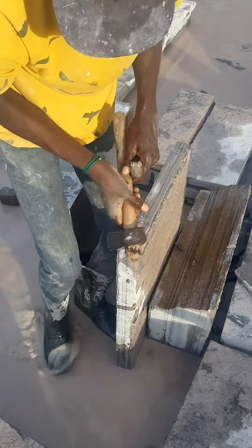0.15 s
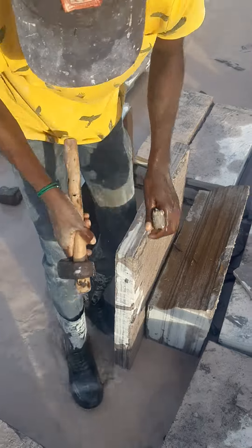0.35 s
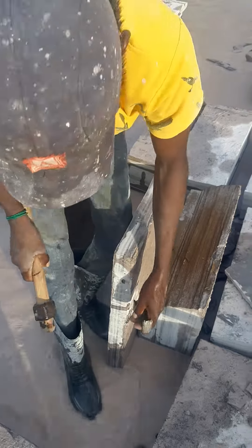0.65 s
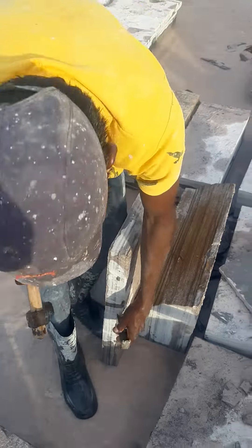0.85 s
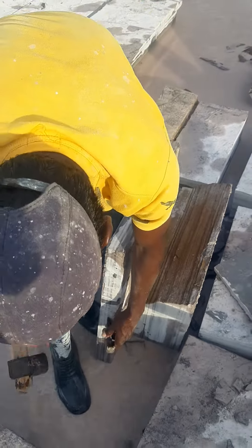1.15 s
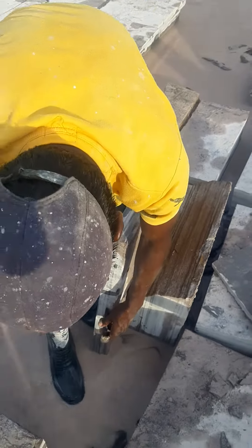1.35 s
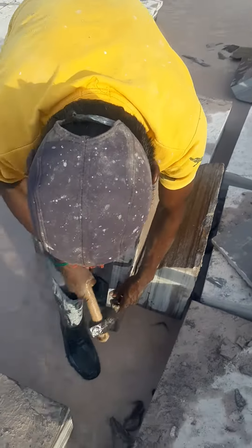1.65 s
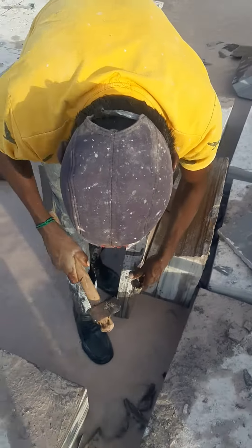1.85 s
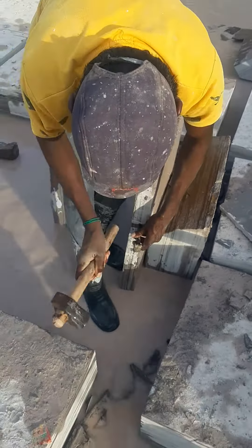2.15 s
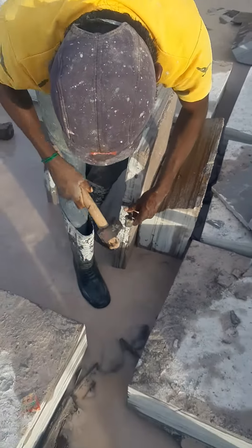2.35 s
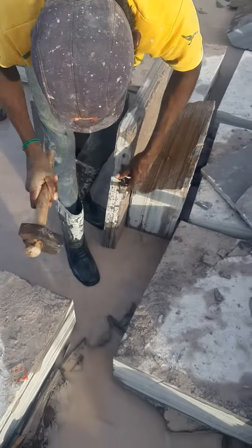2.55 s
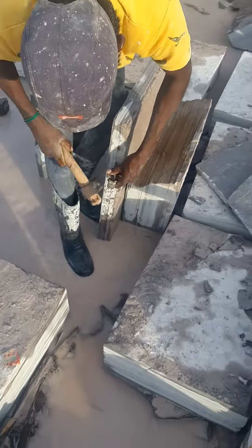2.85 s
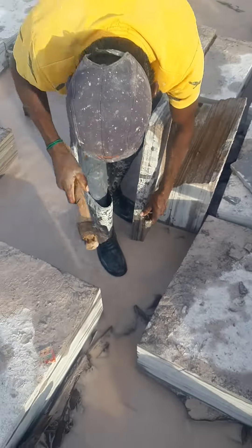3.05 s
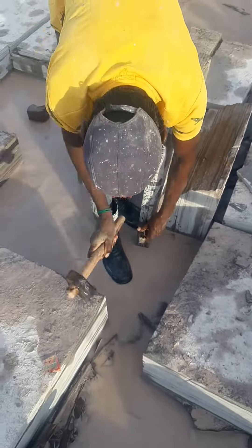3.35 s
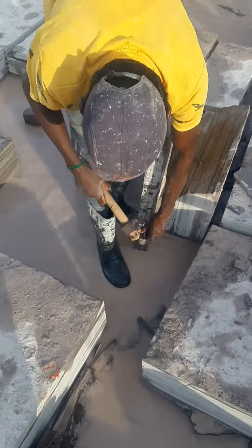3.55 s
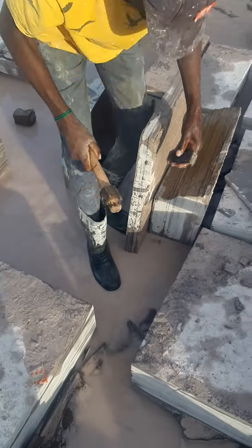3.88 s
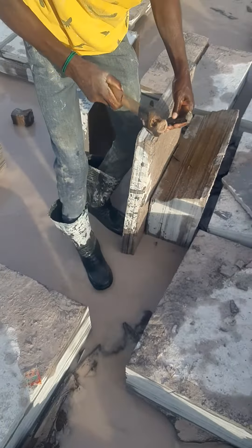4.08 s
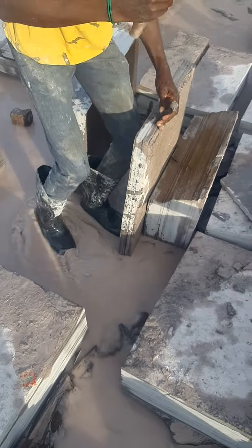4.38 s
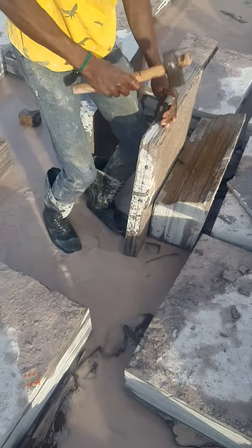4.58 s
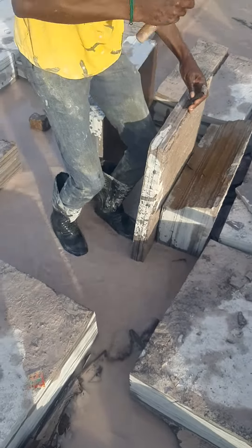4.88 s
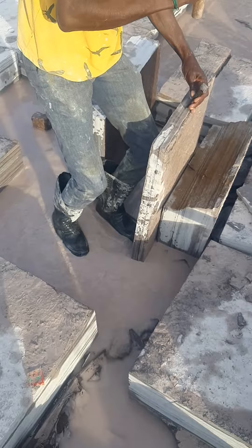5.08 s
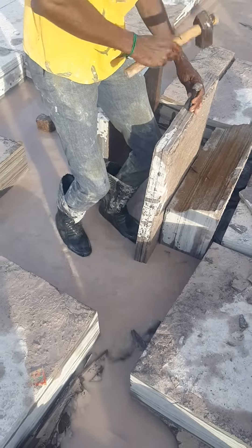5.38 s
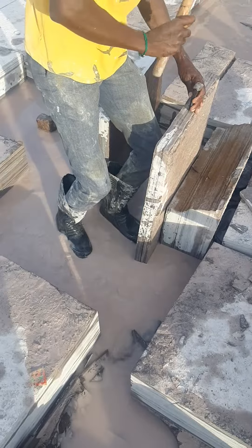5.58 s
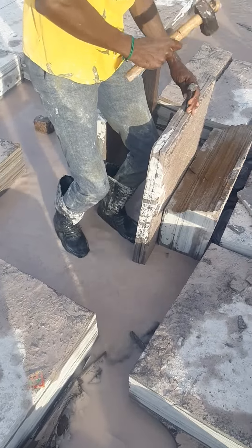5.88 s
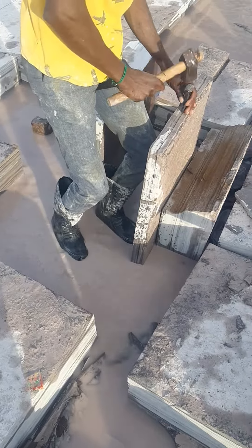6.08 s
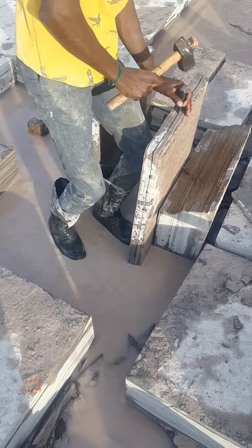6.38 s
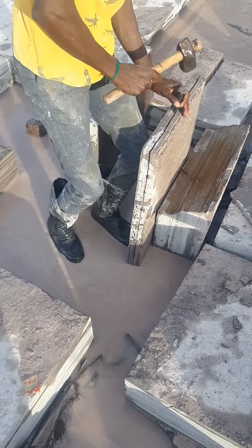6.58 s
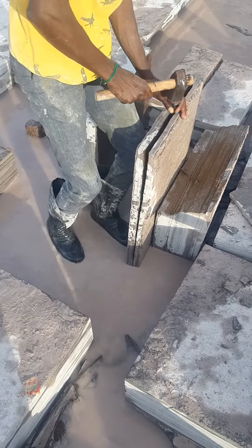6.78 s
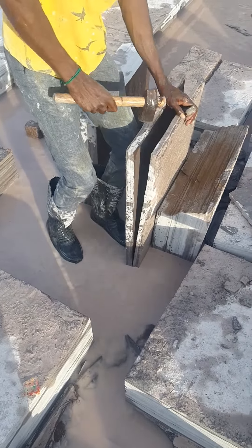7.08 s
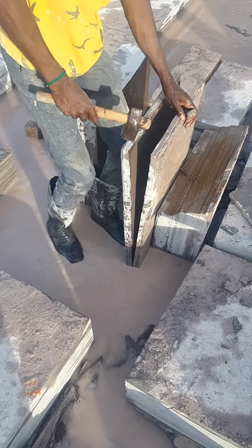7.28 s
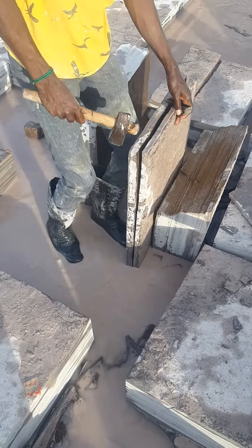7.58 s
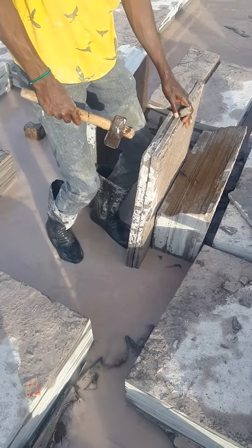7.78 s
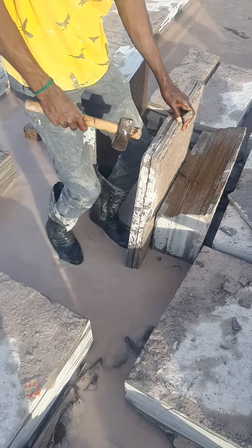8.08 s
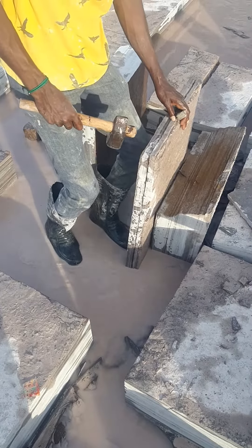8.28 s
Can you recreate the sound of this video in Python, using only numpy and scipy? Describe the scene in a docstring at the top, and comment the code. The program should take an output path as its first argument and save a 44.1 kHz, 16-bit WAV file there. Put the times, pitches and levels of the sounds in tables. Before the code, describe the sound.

An outdoor stone yard, heard close in stereo and nearly dry. Throughout, an engine drones with a throb near 26 pulses a second over low rumble, and wet saws hiss brightly; early on a blade grinds and sings more strongly, easing after 2 s. Around 0.9-1.05 s the slab scrapes and bumps in a gritty cluster. Hammer blows on the chisel follow at 1.65, 2.3, 2.8 and 3.5 s: bright, very short steel clinks with gritty cracks and a stone knock, with lighter touches between until 3.1 s. From 3.9 s, and steadily after 4.8 s, dull taps sound farther off, about four a second. Stronger blows come at 4.6, 5.25, 5.7, 6.1, 6.45 and 6.7 s, the last duller and more stony. The engine speeds up slightly after 5.3 s. Low slab bumps fall at 7.65, 7.8 and 8.35 s while engine and hiss swell to the end.

```python
"""An open stone yard, where a mason splits a standing slab with hammer and chisel.
Behind the work an engine drones in multiples of its firing rate over a noise rumble, stone saws hiss
and grind as coloured noise with ringing blades, and someone farther off taps on dull stone modes.
The slab grates and bumps as bursts of noise ring its modes. Each blow is a steel clink of damped sines,
a crack of crushed grit and a short knock of the slab."""
import sys
import numpy as np
from scipy import signal
from scipy.fft import rfft, irfft, next_fast_len
from scipy.io import wavfile
from scipy.ndimage import uniform_filter1d

SR = 44100
rng = np.random.default_rng(int(sys.argv[2]) if len(sys.argv) > 2 else 0)


def unload_wav(signal):
    """Save mono or channel-first audio to the path in sys.argv[1] as 16-bit WAV at rate SR, clipped to [-1, 1]."""
    wavfile.write(
        sys.argv[1],
        SR,
        np.round(np.clip(np.atleast_2d(signal).T, -1, 1) * 32767).astype(np.int16),
    )


N = 371763  # samples in the scene
BURST = int(0.25 * SR)  # samples in one short sound


def from_db(db):
    """Decibels to gain."""
    return 10 ** (np.asarray(db) / 20)


def rms_one(x):
    """Scale to rms 1."""
    return x / np.sqrt(np.mean(x ** 2) + 1e-20)


def in_time(rows):
    """Draw each column of a time table as a curve, sample by sample."""
    seconds, *columns = np.transpose(rows)
    t = np.arange(N) / SR
    return [np.interp(t, seconds, column) for column in columns]


def at_hz(points, hz):
    """Read a frequency table on a log-frequency axis."""
    table_hz, value = np.transpose(points)
    return np.interp(np.log(hz + 1), np.log(table_hz), value)


def drift(rate_hz):
    """Slow random wander of rms about 1, drawn every 100 samples and joined by straight lines."""
    step = 100
    r = np.exp(-2 * np.pi * rate_hz * step / SR)
    draws = rng.standard_normal(N // step + 1002)
    slow = signal.lfilter([1], [1, -2 * r, r * r], draws)[1000:]  # skip the filter's start
    return np.interp(np.arange(N) / step, np.arange(len(slow)), rms_one(slow))


def add(out, s, sound):
    """Mix a short stereo sound in at a time in seconds."""
    start = max(int(s * SR), 0)
    out[:, start:start + sound.shape[1]] += sound[:, :N - start]


def pair(alike, mid, side):
    """Blend a shared and an opposed signal into left and right of a given likeness."""
    alike = np.clip(alike, -1, 1)
    return np.sqrt(1 + alike) * mid + np.sqrt(1 - alike) * side * np.array([[1], [-1]])


def lagged(x, lag_table):
    """Delay the right channel's phase by frequency, as when sound reaches one ear later."""
    size = next_fast_len(N + BURST)
    hz = np.arange(size // 2 + 1) * SR / size
    lag = np.interp(hz, *np.transpose(lag_table))
    right = irfft(rfft(x[1], size) * np.exp(-1j * lag), size)[:N]
    return np.array([x[0], right])


def resonance(x, hz, width_hz):
    """One damped mode, gain 1 at its top."""
    r = np.exp(-np.pi * width_hz / SR)
    poles = [1, -2 * r * np.cos(2 * np.pi * hz / SR), r * r]
    return (1 - r * r) / 2 * signal.lfilter([1, 0, -1], poles, x)


def dull(x, top_hz=1800):
    """Heavy stone gives off little treble."""
    return signal.sosfilt(signal.butter(4, top_hz, fs=SR, output="sos"), x)


# likeness of the ears for short contacts: (frequency [Hz], likeness [-1 to 1])
CONTACT_LIKENESS = [(450, .9), (700, 0.42), (1400, 0.27), (2200, 0.097)]


def strike(modes, rise_s, contact_s, scatter_db=2.0, grain_db=0):
    """A crunching contact dies away while the body rings; the loudest 4 ms have rms 1."""
    t = np.arange(BURST) / SR
    # grains catch and break about every 2 ms
    catches = from_db(grain_db * np.repeat(rng.standard_normal(BURST), 88)[:BURST])
    envelope = (1 - np.exp(-t / rise_s)) * np.exp(-t / contact_s)
    force = rng.standard_normal((2, BURST)) * catches * envelope + 1e-18
    out = 0
    for k, (hz, width_hz, db) in enumerate(modes):
        ring = resonance(pair(at_hz(CONTACT_LIKENESS, hz), *force), hz, width_hz)
        sign = (-1) ** k  # neighbouring modes push opposite ways
        out = out + sign * from_db(db + scatter_db * rng.standard_normal()) * ring
    power = uniform_filter1d(np.mean(out ** 2, axis=0), size=176)
    return out / np.sqrt(power.max())


# likeness of the ears for the machines: (frequency [Hz], likeness [-1 to 1])
MACHINE_LIKENESS = [(50, 0.78), (150, 1), (400, 0.97), (680, 0.13), (1000, 0.6), (1800, 0.25), (4000, 0.53),
                    (14000, 0.28)]


def far_noise(colour, patchy_db=0.0, patchy_rate=5.5):
    """Coloured stereo noise of rms 1, whose quarter-octave bands can come and go separately."""
    size = next_fast_len(N)
    hz = np.arange(size // 2 + 1) * SR / size
    spectra = rfft(rng.standard_normal((2, size)))
    both = pair(at_hz(MACHINE_LIKENESS, hz), *spectra) * from_db(at_hz(colour, hz))
    if not patchy_db:
        return rms_one(irfft(both, size)[:, :N])
    band = np.clip(np.round(4 * np.log2((hz + 1) / 1000)), 0, 12)
    out = 0
    for k in np.unique(band):
        part = irfft(both * (band == k), size)[:, :N]
        out = out + part * from_db(patchy_db * drift(patchy_rate))
    return rms_one(out)


# ring of the engine casing: (time [s], level [dB])
CASING_RING_LEVEL = [(0, -32), (.6, -28), (1.1, -29.5), (1.55, -34.5), (1.85, -29), (2.2, -35.5),
                     (2.45, -32), (2.95, -36.5), (3.3, -34), (4.5, -38), (5.4, -39.5), (6.5, -41),
                     (7.2, -31.5), (7.6, -37), (8.43, -32)]


def casing(turn, hz=938, width_hz=44, uneven_db=1.5, slip_s=0.00006):
    """Every firing knocks the casing, never quite equally hard or on time, and sets it ringing."""
    level_db, = in_time(CASING_RING_LEVEL)
    firings = np.flatnonzero(np.diff(turn // (2 * np.pi)))
    slips = (slip_s * SR * rng.standard_normal(len(firings))).astype(int)
    knocks = np.zeros(N)
    knocks[np.clip(firings + slips, 0, N - 1)] = from_db(uneven_db * rng.standard_normal(len(firings)))
    # two equal modes in a row soften the onset
    ring = resonance(resonance(knocks + 1e-18, hz, width_hz), hz, width_hz)
    return from_db(level_db) * rms_one(ring)


# engine speed: (time [s], firing rate [firings per s])
FIRING_RATE = [(0.0, 25.9), (0.4, 25.95), (0.8, 26.16), (1.2, 25.83), (2.8, 25.72), (3.6, 25.84),
               (5.2, 25.86), (5.6, 26.05), (6.0, 26.64), (6.4, 26.38), (7.2, 26.45), (7.65, 26.9),
               (8.43, 26.26)]
# engine drone: (time [s], level [dB])
DRONE_LEVEL = [(0.0, -29), (1.27, -28), (1.99, -32), (3.71, -34.5), (4.3, -35.5), (4.76, -32),
               (5.26, -34.5), (7.3, -32), (8.43, -23.5)]
# exhaust spectrum: (multiple of the firing rate, level at idle [dB], level after speeding up [dB])
EXHAUST_ORDERS = [(8, -15, -16), (9, -10.5, -13), (10, -15, -14.5), (11, -7, -9.5), (12, -7.5, -4.5),
                  (13, -6.5, -3.5), (14, -1, 4.5), (15, -5, -5.5), (16, -2, -4.5), (17, -6.5, -7),
                  (18, -8, -9.5), (19, -7, -4.5), (20, 2.5, -2.5), (21, -7.5, -9), (22, -11, -5.5),
                  (25, -11.5, -14), (28, -12.5, -10.5), (29, -14, -10.5), (34, -12.5, -19)]
# the two multiples that swell and fade by themselves: (lower, upper)
SWELLING_ORDERS = (16, 20)
# their swelling: (time [s], change of the lower [dB], change of the upper [dB])
SWELLING_LEVELS = [(0, -4, -4.5), (.8, -17, 3.5), (1.05, 7, 1.5), (1.35, 3, 3), (1.7, 4.5, -3),
                   (2.5, -1.5, 2), (3.3, -4, 4), (3.9, 7.5, -0.5), (4.3, 2, -12), (4.7, -4, 2.5),
                   (5.2, -2, -10.5), (5.95, -7, -9), (6.3, -26, 5), (7.2, 4.5, -2), (8.43, -3, 2)]
# how far a multiple follows the drone's swing: (multiple, share of the swing in dB)
SWING_SHARE = [(18, 1), (34, 1.1)]
# noise under the drone: (time [s], level [dB])
RUMBLE_LOUDNESS = [(0, -34), (1.2, -32), (2, -37), (3.6, -38.5), (4.7, -37), (5.4, -38.5), (7.3, -36),
                   (8.43, -26.5)]
# colour of that noise: (frequency [Hz], level [dB per Hz])
RUMBLE_COLOUR = [(25, -59), (60, -28), (160, -18), (250, -11.5), (370, 3.5), (520, -5.5), (700, -3.5),
                 (950, -4), (1200, -7.5), (1600, -14.5), (1900, -1.5), (2600, -48)]


def engine(orders_db=-5.5, waver_db=2.14, jitter=0.13, uneven_db=0.5):
    """Multiples of the firing rate waver over a throbbing rumble; the casing rings along."""
    speed_up_s, speed_up_takes_s = 5.32, 0.78
    smear_orders, smear_scatter = 9, 0.7  # multiples spread over one firing, and scatter [radians]
    (speed,), (level_db,) = in_time(FIRING_RATE), in_time(DRONE_LEVEL)
    turn = 2 * np.pi * np.cumsum(speed) / SR
    faster = np.clip((np.arange(N) / SR - speed_up_s) / speed_up_takes_s, 0, 1)
    swelling_db = dict(zip(SWELLING_ORDERS, in_time(SWELLING_LEVELS)))
    mean_db = level_db.mean()
    drone = 0
    for k, idle_db, fast_db in EXHAUST_ORDERS:
        share = np.interp(k, *np.transpose(SWING_SHARE))
        drone_db = mean_db + share * (level_db - mean_db)
        order_db = orders_db + idle_db + faster * (fast_db - idle_db) + swelling_db.get(k, 0)
        gain = from_db(drone_db + order_db + waver_db * drift(2.7))
        smear = -np.pi * k * k / smear_orders + smear_scatter * rng.standard_normal()
        drone = drone + gain * np.cos(k * turn + smear + jitter * drift(2.7))
    throb = 1 + 0.057 * np.cos(turn)
    rumble = from_db(in_time(RUMBLE_LOUDNESS)[0]) * far_noise(RUMBLE_COLOUR) * throb
    both = drone * from_db(uneven_db * drift(12.0)) + rumble + casing(turn)
    return both * from_db([[-0.9], [0.9]])  # left, right


# saw blade modes: (start [s], end [s], frequency [Hz], width [Hz], level against the hiss [dB])
BLADE_MODES = [(-3, 0.7, 3940, 110, -4), (-1, .49, 3090, 200, -4), (0.5, 1.53, 3390, 25, -7),
               (5, 10, 4760, 76, -7), (4.5, 10, 3720, 450, -7.5), (.5, 10, 6700, 210, -8.5)]


def blades(fade_s=0.26, sway_db=1.07):
    """Friction in the cut keeps one blade resonance or another singing for a while."""
    t, out = np.arange(N) / SR, np.zeros((2, N))
    for start, end, hz, width_hz, db in BLADE_MODES:
        friction = pair(at_hz(MACHINE_LIKENESS, hz), *rng.standard_normal((2, N)))
        ring = resonance(friction, hz, width_hz)
        held = np.clip(np.minimum(t - start, end - t) / fade_s + 1, 0, 1)
        out += from_db(db + sway_db * drift(9.0)) * held * rms_one(ring)
    return out


# load on the saws: (time [s], level [dB])
CUTTING_LOAD = [(0.0, -24), (0.61, -26.5), (1.1, -24.5), (1.5, -24), (2.18, -28.5), (4.51, -28),
                (4.98, -26), (5.94, -31.5), (6.71, -30.5), (7.91, -25), (8.19, -20), (8.43, -21.5)]
# colours of the grind, the hiss and the spray: (frequency [Hz], level [dB per Hz])
GRIND_COLOUR = [(1000, -19), (1600, -5.5), (2200, 3.5), (2800, 5.5), (3300, 5.5), (4000, -37), (5000, -62),
                (7000, -30.5)]
HISS_COLOUR = [(1500, -49.5), (2600, -28), (3200, 7), (3800, 8), (4600, 9.5), (5400, 6), (6200, 6),
               (6900, 0.5), (7600, -2.5), (8600, -16), (10000, -20.5)]
SPRAY_COLOUR = [(7000, -9), (8500, 9), (9800, 3), (11200, 19.5), (12600, 11), (14000, 17.5), (15200, 12),
                (16000, 0)]


def saws(flutter_db=1.02):
    """Wet blades grind and hiss in the cut and throw a fine spray; all three follow the load."""
    hiss_db, grind_db, spray_db = -0.24, -10.5, -10  # against the load
    # at first one blade is deep in a cut and grinds louder, then runs out
    deep_cut_db, deep_cut_end_s, run_out_s = 7, 1.93, 0.74
    load_db, = in_time(CUTTING_LOAD)
    deep = np.exp(-np.maximum(np.arange(N) / SR - deep_cut_end_s, 0) / run_out_s)
    flutter = flutter_db * drift(48.0)
    grind_gain = from_db(load_db + grind_db + deep_cut_db * deep + 1.04 * drift(13.0))
    grind = grind_gain * far_noise(GRIND_COLOUR, patchy_db=2.35)
    hiss_and_rings = far_noise(HISS_COLOUR, patchy_db=1.5) + blades()
    hiss = from_db(load_db + hiss_db + flutter) * hiss_and_rings
    spray = from_db(load_db + spray_db + flutter) * far_noise(SPRAY_COLOUR)
    # left, right
    return (grind + hiss) * from_db([[-0.6], [0.6]]) + spray * from_db([[0.5], [-0.5]])


# tapping farther off: (time [s], level [dB], strongest ring [Hz])
DISTANT_TAPS = [(s, -26.5, 1700) for s in (3.87, 4.81, 5.044, 5.289, 5.52, 5.75, 5.971, 6.203, 6.429, 6.876, 7.1, 7.323, 7.543)] + [(7.78, -22, 1450),
                (8.023, -19.5, 1300)]
# modes of the far stone: (frequency [Hz], width [Hz], level [dB])
DISTANT_STONE_MODES = [(1250, 810, -15), (1510, 310, -10), (1900, 180, -8)]


def far_tapping(tick_db=-30, top_hz=2100):
    """Light, dull taps ring another stone, mostly about four a second, each with a faint tool tick."""
    out = np.zeros((2, N))
    for s, db, hz in DISTANT_TAPS:
        body = strike(DISTANT_STONE_MODES, 0.00075, 0.0048)
        ring = strike([(hz, 140, 0)], 0.00054, 0.0032)
        tick = strike([(3580, 460, 0)], 0.0003, 0.005)
        add(out, s, from_db(db) * dull(body + ring, top_hz) + from_db(tick_db) * tick)
    return out


def yard(x, t60=0.082, dull_hz=5000, gap_s=0.007):
    """Short, dull scatter from the stacked slabs, as decaying noise after a gap."""
    t = np.arange(BURST) / SR
    echoes = rng.standard_normal((2, BURST)) * from_db(-60 * t / t60) * (t > gap_s)
    echoes = signal.sosfilt(signal.butter(1, dull_hz, fs=SR, output="sos"), echoes)
    return signal.fftconvolve(x, rms_one(echoes) / np.sqrt(BURST), axes=1)[:, :N]


# slab shifting and bumping: (time [s], thud level [dB], grit level [dB], dying time [s],
# added ring [Hz], top of the sound [Hz])
SLAB_SHIFTS = [(0.862, -18, -24, 0.014, 650, 1900), (0.9599, -12, -19, 0.0082, 620, 2100),
               (0.968, -18, -12, 0.011, 1400, 3000), (0.979, -9.5, -24, 0.011, 850, 1900),
               (0.995, -15, -21.5, 0.027, 644, 2200), (1.023, -19, -25, 0.015, 400, 1800),
               (1.045, -19.5, -26, 0.022, 430, 1500), (5.6664, -21, -20.5, 0.015, 706, 2200),
               (5.679, -25.5, -23, 0.025, 980, 2700), (5.908, -26, -28, 0.019, 680, 1900),
               (7.655, -14, -27, 0.006, 445, 1310), (7.796, -20.5, -36, 0.006, 397, 1300),
               (8.336, -14, -19, 0.0077, 400, 1400)]
# low modes of the slab, then modes of rasping grit: (frequency [Hz], width [Hz], level [dB])
SLAB_MODES = [(345, 64, -5.5), (410, 46, 1), (484, 310, -4.5), (620, 124, 2.5), (855, 160, -3.5)]
RASP_MODES = [(1210, 260, 6.4), (1480, 340, 9.6), (1800, 320, 9.7), (2370, 400, 4.2)]


def slab(ring_db=-2.0, body_db=-4.0):
    """Stone drags on stone in jerks: grit rasps and the slab booms, with a ring chosen for each jerk."""
    out = np.zeros((2, N))
    for s, thud_db, grit_db, dying_s, ring_hz, top_hz in SLAB_SHIFTS:
        body = from_db(body_db) * strike(SLAB_MODES, 0.00047, dying_s, grain_db=3.5)
        ring = from_db(ring_db) * strike([(ring_hz, 90, 0)], 0.00041, dying_s)
        rasp = strike(RASP_MODES, 0.0015, dying_s, grain_db=5.5)
        add(out, s, dull(from_db(thud_db) * (body + ring) + from_db(grit_db) * rasp, top_hz))
    # a thin slab radiates almost no deep bass
    return signal.sosfilt(signal.butter(3, 170, "high", fs=SR, output="sos"), out)


def steel_ring(hz, t60_s, rise_s=0.00037, spread=1.4):
    """One pure mode of the chisel, out of step at the ears by spread radians; about rms 1 at first."""
    t = np.arange(BURST) / SR
    phase = rng.uniform(0, 2 * np.pi) + rng.choice([-1, 1]) * spread * np.array([[0], [1]])
    wave = np.sin(2 * np.pi * hz * t + phase) * (1 - np.exp(-t / rise_s)) * from_db(-60 * t / t60_s)
    return wave / np.sqrt(uniform_filter1d(wave ** 2, size=176).max())


# lower modes of the chisel: (frequency [Hz], width [Hz], level [dB])
CHISEL_MODES = [(2400, 320, -8), (3250, 630, 0), (3780, 600, -0.5), (4340, 790, -7.5)]


def clink(hz, t60_s=0.023, modes_db=-0.5):
    """The chisel's lowest ring among its neighbouring modes, damped by the gripping hand."""
    return steel_ring(hz, t60_s) + from_db(modes_db) * strike(CHISEL_MODES, 0.00018, 0.0031)


# higher modes of the chisel: (frequency [Hz], width [Hz], level [dB])
CHISEL_HIGH_MODES = [(4480, 860, -2.2), (5440, 860, -1.8), (6250, 630, 0)]


def ping(hz, t60_s=0.024, modes_db=-1):
    """A higher ring, which depends on the grip and on where the chisel is hit."""
    return steel_ring(hz, t60_s) + from_db(modes_db) * strike(CHISEL_HIGH_MODES, 0.00019, 0.004)


def touch(clink_db, knock_db, clink_hz, knock_hz):
    """A clink cut short by the resting hammer and a faint answer of the stone."""
    steel = steel_ring(clink_hz, 0.012) + from_db(-5.0) * strike(CHISEL_MODES, 0.00022, 0.0053)
    stone = strike([(knock_hz, 380, 0)], 0.0014, 0.0039)
    return from_db(clink_db) * steel + from_db(knock_db) * stone


# modes of the stone under the edge: (frequency [Hz], width [Hz], level [dB])
KNOCK_MODES = [(1022, 170, -5), (1215, 500, -2.5), (1430, 580, 0.5), (1500, 330, -6.5), (2220, 490, -19)]


def knock(db, hz):
    """The stone under the edge answers with one strong mode among the others."""
    ring = strike([(hz, 110, 0)], 0.00021, 0.0036)
    return from_db(db) * dull(ring + strike(KNOCK_MODES, 0.0011, 0.0016))


# full hammer blows: (time [s], clink level [dB], rebound level [dB], ping level [dB],
# grit crack level [dB], stone knock level [dB], slab thud level [dB], ground jolt level [dB],
# clink [Hz], ping [Hz], highest ring [Hz], knock [Hz])
HAMMER_BLOWS = [(1.6705, -23, -29, -14.5, -14, -20, -24, -20.5, 3050, 5070, 6250, 930),
                (2.2807, -18.5, -23, -15, -13, -24, -25, -36, 3310, 4900, 6680, 940),
                (2.783, -16, -21, -15.5, -20, -26, -22, -21, 2940, 4160, 6500, 870),
                (3.4698, -19, -21.5, -15.5, -22.5, -21.5, -15.5, -28, 2950, 5050, 6740, 1070),
                (4.6305, -15.5, -21, -19.5, -21, -15.5, -21.5, -40, 2970, 5050, 6550, 970),
                (5.2645, -16.5, -22, -19, -20, -21.5, -24.5, -24, 3300, 5040, 6200, 1280),
                (5.7244, -14.5, -18, -22, -27, -16.5, -21, -26, 3250, 3800, 7100, 935),
                (6.1244, -18, -15, -24, -31, -18, -19, -37, 3025, 3950, 6270, 1320),
                (6.45, -22, -17, -26, -30, -20, -21, -43, 2980, 5000, 6900, 1250),
                (6.727, -26, -33, -30, -48, -15, -32, -48, 2870, 4050, 6780, 1440)]
# light touches of hammer on chisel around the first blows: (time [s], clink level [dB],
# knock level [dB], clink [Hz], knock [Hz])
LIGHT_TOUCHES = [(1.629, -12, -15.5, 3180, 2030), (2.0157, -12.5, -25, 3180, 1390),
                 (2.3237, -15.5, -27.5, 3520, 1340), (2.6115, -17.5, -30, 3500, 1430),
                 (2.872, -19, -33, 3500, 1410), (3.126, -20, -37, 3400, 1400)]
# modes of crushed grit, then of the jolted ground: (frequency [Hz], width [Hz], level [dB])
GRIT_MODES = [(6160, 980, 2), (11400, 570, 19), (16100, 1140, 17.5)]
JOLT_MODES = [(70, 44, 2.2), (192, 950, 2.6)]


def hammer(knock_delay_s=0.00127, thud_delay_s=0.0011, rebound_s=0.0037):
    """Steel clinks first and grit cracks under the edge; the heavier slab answers a moment later."""
    top_ring_db, top_ring_t60_s = -25, 0.022  # highest ring, woken only by full blows
    out = np.zeros((2, N))
    for (s, clink_db, rebound_db, ping_db, crack_db, knock_db, thud_db, jolt_db,
         clink_hz, ping_hz, top_hz, knock_hz) in HAMMER_BLOWS:
        add(out, s, from_db(clink_db) * clink(clink_hz))
        add(out, s, from_db(ping_db) * ping(ping_hz))
        add(out, s, from_db(top_ring_db) * steel_ring(top_hz, top_ring_t60_s))
        # the chisel springs back against the hammer
        add(out, s + rebound_s, from_db(rebound_db) * clink(clink_hz))
        add(out, s, from_db(crack_db) * strike(GRIT_MODES, 0.0001, 0.0061))
        add(out, s, from_db(jolt_db) * strike(JOLT_MODES, 0.00016, 0.00097))
        add(out, s + knock_delay_s, knock(knock_db, knock_hz))
        add(out, s + thud_delay_s, from_db(thud_db) * dull(strike(SLAB_MODES, 0.0006, 0.0065)))
    # a light touch crushes no grit and does not move the slab
    for s, clink_db, knock_db, clink_hz, knock_hz in LIGHT_TOUCHES:
        add(out, s, touch(clink_db, knock_db, clink_hz, knock_hz))
    return out * from_db([[-0.5], [0.5]])  # left, right


# phase lag of the right channel, machines then tool work: (frequency [Hz], lag [radians])
MACHINE_PHASE_LAG = [(550, 0), (720, 2.5), (1400, 2.7), (4050, 7), (16000, 30)]
TOOL_PHASE_LAG = [(550, 0), (800, 1.0), (1400, 1.1), (2200, 0)]


def scene():
    """The machines lag widely between the ears; the work lags less and scatters off the yard."""
    machines = lagged(engine() + saws(), MACHINE_PHASE_LAG)
    work = lagged(far_tapping() + hammer(), TOOL_PHASE_LAG) + slab()
    return machines + from_db(-18.0) * yard(work) + work


def record(dry):
    """Peaks are clipped and the top is cut steeply at 16.6 kHz."""
    top_cut = signal.cheby2(14, 60, 16600, fs=SR, output="sos")
    return signal.sosfilt(top_cut, np.clip(dry, -1, 1))


dry = scene()
out = record(dry)
unload_wav(out)
```